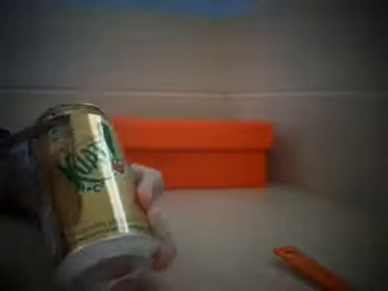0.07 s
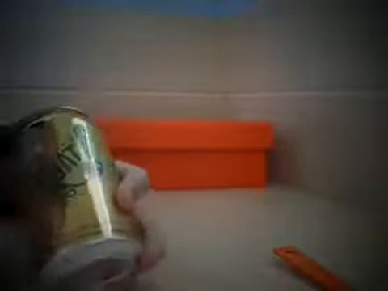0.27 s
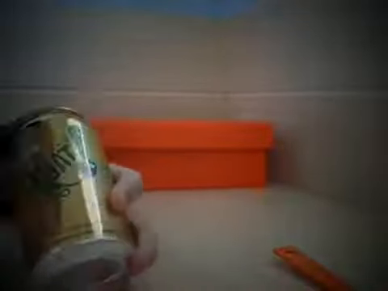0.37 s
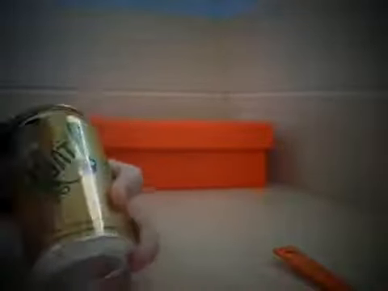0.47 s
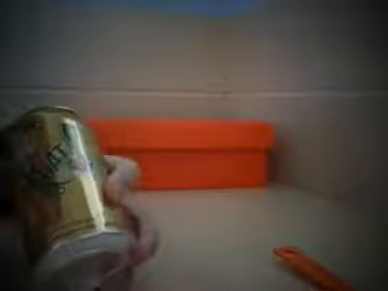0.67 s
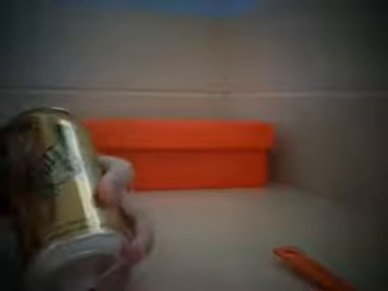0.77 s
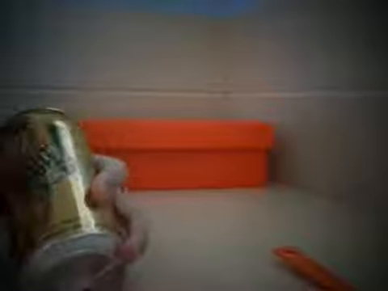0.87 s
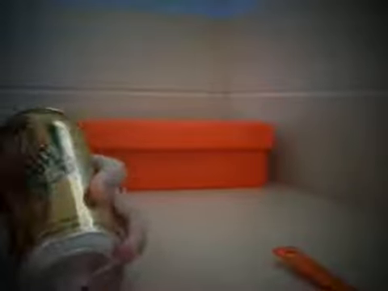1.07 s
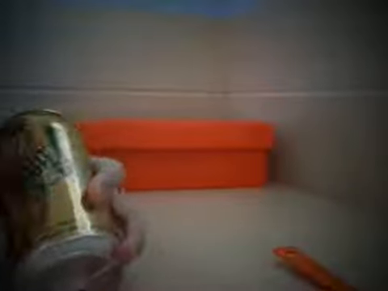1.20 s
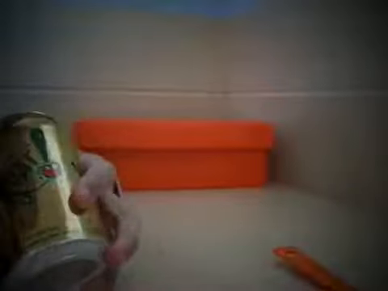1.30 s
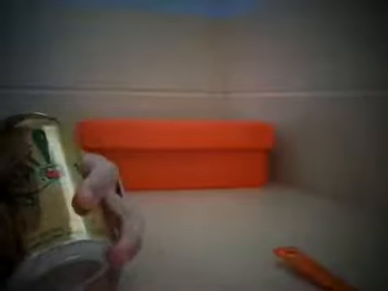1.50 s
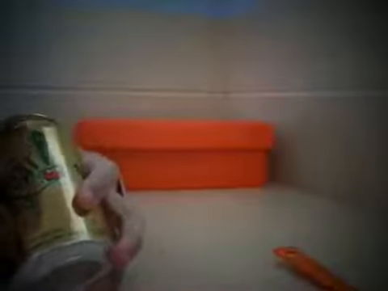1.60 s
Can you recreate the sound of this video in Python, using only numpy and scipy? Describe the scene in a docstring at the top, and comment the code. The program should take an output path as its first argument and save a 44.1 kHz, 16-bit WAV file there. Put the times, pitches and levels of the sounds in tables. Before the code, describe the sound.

A drinks can clacks sharply twice in quick succession and rings briefly. A softer double click follows, then hollow finger bumps and scratchy rubbing as the grip shifts, all heard close up in a small, slightly echoing room.

```python
"""Drinks can in a nook

A can is handled on a table in a hard-walled nook, close to the microphone. One loud double clack
sets the metal ringing, a lighter double click of the thin wall follows, and fingers bump and rub
the can. The nook adds quick echoes and a hollow boom; a small room rings on behind it, in stereo,
over quiet hiss."""
import sys
import numpy as np
from scipy import signal
from scipy.fft import rfft, irfft, next_fast_len
from scipy.io import wavfile
from scipy.ndimage import uniform_filter1d

SR = 44100
rng = np.random.default_rng(int(sys.argv[2]) if len(sys.argv) > 2 else 0)


def generate_wav(signal):
    """Clip the signal to [-1, 1] and save it as 16-bit WAV at the path in sys.argv[1]."""
    frames = np.transpose(np.atleast_2d(signal))
    scaled = np.clip(frames, -1, 1) * 32767
    pcm = np.round(scaled).astype(np.int16)
    wavfile.write(sys.argv[1], SR, pcm)


N = 72765

# steady hiss of the room: f/Hz, density/dB
HISS_SPECTRUM = [(25, 10.5), (60, -15), (120, -8), (180, -3.5), (300, -10.5), (500, -4), (1100, -8.5),
                 (2600, -10), (4600, -12.5), (14900, -14.5)]
# diffuse tail of the small room: f/Hz, level/dB, t60/s
ROOM_TAIL = [(62.4, 2.5, 0.8), (187, 6, 0.17), (492, -2, .55), (1220, -2.5, 0.69), (2620, -1, 0.62),
             (5960, -4.5, 0.57), (13750, 1, 0.47)]
# diffuse tail of the nook: f/Hz, level/dB, t60/s
NOOK_TAIL = [(60, -7, 0.069), (510, -6.5, 0.038), (2470, -1, 0.17), (7110, -1, 0.083), (13630, 5.5, 0.12)]
# left-right likeness of both tails: f/Hz, likeness/0-1
TAIL_LIKENESS = [(60, .8), (400, 0.99), (1500, 0.92), (3000, 0.87), (6000, 0.7), (14000, 0.7)]
# first echoes off the nook walls: delay/s, gain
WALL_ECHOES = [(.00165, 0.35), (.00335, 0.34), (.0051, .16)]
# rumble of the shifting grip: t/s, level/dB
RUMBLE_LEVELS = [(0, -81), (0.05, -57), (0.101, -77.5), (1.215, -70), (1.243, -40.5), (1.281, -43.5),
                 (1.31, -54.5), (1.371, -60), (1.48, -60.5), (1.55, -73), (1.65, -69)]
# resonances of that rumble: f/Hz, half-width/Hz, level/dB
RUMBLE_RESONANCES = [(80, 18, -6.5), (182, 22, -5.5), (283.4, 13, -1.5), (378, 8.3, -0.5)]
# fingers rubbing the can: t/s, body level/dB, scratch level/dB
RUB_LEVELS = [(0, -42, -52), (0.04, -56.5, -56.5), (0.071, -47.5, -55.5), (0.11, -65, -55),
              (0.199, -53.5, -56.5), (0.26, -45, -92), (0.64, -72, -61), (0.687, -43.5, -47.5),
              (0.72, -54, -74), (0.949, -78, -75), (1.109, -55, -67.5), (1.188, -63.5, -65.5),
              (1.222, -38, -38), (1.236, -29, -35), (1.262, -29.5, -38.5), (1.282, -21.5, -35.5),
              (1.296, -55, -52), (1.34, -83, -89), (1.384, -58, -64), (1.393, -49, -34), (1.412, -34, -33),
              (1.427, -36, -51.5), (1.468, -44.5, -48.5), (1.51, -64, -92), (1.555, -49.5, -65),
              (1.587, -39.5, -47), (1.612, -45, -38), (1.65, -55, -52)]
# resonances of the rubbed hollow body: f/Hz, full bandwidth/Hz, level/dB
BODY_RESONANCES = [(452.7, 7.3, 1), (494.1, 5.8, -5), (536, 5.3, -2), (618, 8.4, -3.5), (752, 25, -9),
                   (975, 10, -11), (1042, 16, -10), (1378, 53, -29.5)]
# scratch of skin on metal: f/Hz, density/dB
SCRATCH_SPECTRUM = [(30, -21.5), (150, -13), (300, -18.5), (550, -17), (1000, 4), (1600, 1.5), (2400, 2),
                    (3800, 1.5), (4700, -3.5), (6200, -4), (9000, -9), (14500, -18.5)]
# brief slips within the rubbing: t/s, level/dB
FINGER_SLIPS = [(0.05, -41.5), (0.6188, -31), (1.2078, -47), (1.2150, -38.5), (1.2272, -34), (1.2375, -29),
                (1.2493, -41.5), (1.2579, -31), (1.2704, -28), (1.277, -29.5), (1.2850, -35.5),
                (1.4085, -31), (1.599, -44)]
# soft bumps of fingers and can: t/s, level/dB
FINGER_BUMPS = [(0.3750, -37), (0.3880, -52), (0.6965, -39.5), (1.0140, -33.5), (1.0720, -49),
                (1.0920, -48.5), (1.2390, -23), (1.2580, -25.5), (1.2690, -57), (1.2780, -25.5),
                (1.4110, -37.5), (1.4600, -33), (1.5670, -50), (1.6060, -38), (1.6280, -36.5)]
# hollow boom of any bump: f/Hz, level/dB, t60/s
BOOM_MODES = [(453, 0, .105), (505, -5, .045), (630, -19, .08), (813, -18, .09), (1070, -22, .04),
              (1440, -24, .04)]
# light clicks of the thin wall: t/s, level/dB, boom/dB re the click
WALL_CLICKS = [(0.0497, -37, -19), (0.066, -48, -30), (0.1290, -47, -30), (0.1450, -50, -28),
               (0.6196, -26.5, -16.5), (0.6313, -24, -9.5), (0.694, -54.5, 11), (1.0137, -43.5, -20.5),
               (1.4080, -29, -10.5)]
# metal ringing after a click: f/Hz, level/dB, t60/s
WALL_MODES = [(821, -11.5, .022), (2247, 3.5, 0.036), (2970, -18, 0.054), (4080, -10, 0.029),
              (5460, -12.5, .01)]
# snap of a click: f/Hz, density/dB
SNAP_SPECTRUM = [(60, -49.5), (150, -22.5), (300, -27), (520, -2), (850, 5.5), (1200, -8), (1500, -6),
                 (2300, 1), (4000, -2), (7500, -21), (11000, -16.5), (14500, -42)]
# hard knocks that make up the double clack: t/s, level/dB, boom/dB re the knock
HARD_KNOCKS = [(0.2115, -37.5, -19.5), (0.2150, -26.5, -7.5), (0.2179, -21.5, -25.5),
               (0.2191, -11.5, -17.5), (0.2222, -25.5, -20.5), (0.2319, -16.5, -13), (0.241, -18.5, -8),
               (0.2455, -23.5, -23.5)]
# metal ringing after a hard knock: f/Hz, level/dB, t60/s
KNOCK_MODES = [(689, -17, .12), (1000, -22, .08), (1825, -18, .08), (2073, -17, .24), (2300, -19, .22),
               (2379, -6, .065), (2606, -18, .16), (2850, -13, .09), (2928, -7, .05), (3000, -4, .055),
               (3157, -14, .06), (3542, -10, .065), (4152, -13, .05), (5308, -17, .05), (5800, -6, .02),
               (7472, -15, .05)]
# crack of a hard knock: f/Hz, density/dB
CRACK_SPECTRUM = [(30, -26), (100, -25.5), (180, -9.5), (320, -15), (480, -6.5), (1050, -4), (1300, -6.5),
                  (1850, -4), (2700, 1), (4500, -6), (5800, -7.5), (8500, -14.5), (14500, -26)]

HISS_DB, HISS_LIKENESS = -59.5, 0.84
WHINE_DB, WHINE_HZ, WHINE_HALF_WIDTH_HZ = -71, 12290, 60
GRAINS_PER_S, GRAIN_SPREAD_DB, SLIP_S = 1100, 5.5, .0011
BODY_LOW_HZ, BODY_HIGH_HZ, METAL_LOW_HZ = 355, 1800, 453
SNAP_SEND, RING_SEND, HOLLOW_SEND = .68, .15, .4  # gains into the diffuse tails


def amp(db):
    """Decibels to gain."""
    return 10 ** (np.asarray(db) / 20)


def unit_rms(x):
    """Scales to rms 1."""
    return x / np.sqrt(np.mean(x ** 2) + 1e-20)


def unit_hit(x):
    """Scales a short sound to the energy of 10 ms at rms 1."""
    return x / np.linalg.norm(x) * np.sqrt(SR / 100)


def lookup(table, hz, column=1):
    """Interpolates one column of a table on a log-frequency axis."""
    columns = np.transpose(table)
    return np.interp(np.log(hz + 1), np.log(columns[0] + 1), columns[column])


def filtered(x, gain):
    """Filters by a gain that is a function of frequency."""
    size = 2 * next_fast_len(N)
    return irfft(rfft(x, size) * gain(np.fft.rfftfreq(size, 1 / SR)), size)[..., :N]


def stereo(x, likeness):
    """Mixes two unrelated signals into left and right, with a given likeness per frequency."""
    mid = filtered(x[0], lambda hz: np.sqrt((1 + likeness(hz)) / 2))
    side = filtered(x[1], lambda hz: np.sqrt((1 - likeness(hz)) / 2))
    return np.array([mid + side, mid - side])


def play(events, sound):
    """Starts a sound at the time and level that open each row."""
    track = np.zeros(N + len(sound))
    for start_s, db, *_ in events:
        at = round(start_s * SR)
        track[at:at + len(sound)] += amp(db) * sound
    return track[:N]


def background():
    """Room tone: quiet hiss with a faint high whine."""
    noise = stereo(rng.standard_normal((2, N)), lambda hz: HISS_LIKENESS)
    hiss = filtered(noise, lambda hz: amp(lookup(HISS_SPECTRUM, hz)))
    whine = filtered(rng.standard_normal(N),
                     lambda hz: 1 / (1 + ((hz - WHINE_HZ) / WHINE_HALF_WIDTH_HZ) ** 2))
    return amp(HISS_DB) * unit_rms(hiss) + amp(WHINE_DB) * unit_rms(whine)


def diffuse_tail(x, bands, rise_s):
    """Dense reflections build up at the microphone, then each band dies at its own speed."""
    hz, t, noise = signal.stft(rng.choice([-1., 1.], (2, N)), SR, nperseg=256)
    rate = np.log(1000) / lookup(bands, hz, column=2)[:, None]
    decay = np.sqrt(2 * rate / SR) * np.exp(-rate * t)  # same energy at any t60
    spectra = noise * amp(lookup(bands, hz))[:, None] * decay
    response = signal.istft(spectra, SR, nperseg=256)[1][:, :N]
    response = stereo(response, lambda f: lookup(TAIL_LIKENESS, f))
    response *= 1 - np.exp(-(np.arange(N) / SR / rise_s) ** 2)
    return signal.fftconvolve(x[None], response, axes=1)[:, :N]


def nook_echoes(x):
    """The direct sound plus its first echoes off the nearby hard walls."""
    return x + sum(gain * np.pad(x, (round(delay_s * SR), 0))[:N] for delay_s, gain in WALL_ECHOES)


def even_grip(x, window_s=.0227):
    """Holds a noisy sound near rms 1, as an even grip does."""
    size = round(window_s * SR)
    power = uniform_filter1d(uniform_filter1d(x ** 2, size), size)
    return x / np.sqrt(abs(power) + 1e-20)


def grip_rumble():
    """The hand shifts its grip and stirs low resonances under the rubbing."""
    def resonances(hz):
        return sum(amp(db) / (1 + ((hz - f) / width) ** 2) for f, width, db in RUMBLE_RESONANCES)

    level_db = np.interp(np.arange(N) / SR, *np.transpose(RUMBLE_LEVELS))
    return even_grip(filtered(rng.standard_normal(N), resonances)) * amp(level_db)


def hollow_body(hz):
    """Response of the rubbed can: narrow resonances, with bass and treble rolled off."""
    peaks = sum(amp(db) / (1 + 2j * (hz - f) / width) for f, width, db in BODY_RESONANCES)
    return peaks / (1 + (hz / BODY_HIGH_HZ) ** 4) / (1 + (BODY_LOW_HZ / (hz + 1)) ** 4)


def skin_scratch(friction):
    """Gives friction the colour of skin on metal, at rms 1."""
    return unit_rms(filtered(friction, lambda hz: amp(lookup(SCRATCH_SPECTRUM, hz))))


def rubbing():
    """Tiny stick-slip grains drive the hollow body and scratch the wall; a few slips stand out."""
    t = np.arange(N) / SR
    times, body_db, scratch_db = np.transpose(RUB_LEVELS)
    grains = rng.standard_normal((2, N)) * (rng.random((2, N)) < GRAINS_PER_S / SR)
    grains *= amp(GRAIN_SPREAD_DB * np.minimum(rng.exponential(1, (2, N)), 3))
    body = even_grip(filtered(grains[0], hollow_body)) * amp(np.interp(t, times, body_db))
    scratch = skin_scratch(grains[1]) * amp(np.interp(t, times, scratch_db))
    slip_envelope = sum(amp(db) * np.exp(-.5 * ((t - at) / SLIP_S) ** 2) for at, db in FINGER_SLIPS)
    slips = skin_scratch(rng.standard_normal(N)) * slip_envelope
    return body, scratch + slips


def ring(modes, low_hz, bend=0, settle_s=1):
    """Dying sines of a small struck object, which radiates no bass; bend starts them sharp."""
    t = np.arange(SR // 2) / SR
    bent_t = t + bend * settle_s * (1 - np.exp(-t / settle_s))
    sines = sum(amp(db - 60 * t / t60) * np.sin(2 * np.pi * hz * bent_t) for hz, db, t60 in modes)
    low_cut = signal.butter(3, low_hz, "high", fs=SR, output="sos")
    return unit_hit(signal.sosfilt(low_cut, sines))


def hollow_booms():
    """Every bump, knock and click stirs the same hollow boom, which sags in pitch as it dies."""
    thuds = [(at, db + boom_db) for at, db, boom_db in HARD_KNOCKS + WALL_CLICKS]
    return play(FINGER_BUMPS + thuds, ring(BOOM_MODES, low_hz=347, bend=.16, settle_s=.0077))


def metal_ringing():
    """The metal rings after each hard knock, and very briefly after each click."""
    knocked = play(HARD_KNOCKS, ring(KNOCK_MODES, METAL_LOW_HZ))
    clicked = play(WALL_CLICKS, ring(WALL_MODES, METAL_LOW_HZ))
    return amp(-3) * knocked + amp(-6) * clicked


def tick(spectrum, size=4096):
    """A sharp-fronted, minimum-phase click of a given colour."""
    hz = abs(np.fft.fftfreq(size, 1 / SR))
    log_gain = np.log(amp(lookup(spectrum, hz)))
    minimum_phase = np.exp(np.conj(signal.hilbert(log_gain)))
    return unit_hit(np.fft.ifft(minimum_phase).real[:size // 2])


def contact(spectrum, fade_s, rattle):
    """A click followed by a few milliseconds of even-toned chatter in the contact."""
    t = np.arange(SR // 20) / SR
    fade = amp(-60 * t / fade_s)
    chatter = rng.standard_normal(len(t)) * fade
    chatter *= rattle / np.linalg.norm(chatter)
    chatter[0] += 1  # the first impact
    for _ in range(10):  # flatten the spectrum while keeping the burst short
        bins = rfft(chatter)
        chatter = irfft(bins / (abs(bins) + 1e-12), len(t)) * np.minimum(10 * fade, 1)
    return unit_hit(signal.fftconvolve(chatter, tick(spectrum)))


def wall_snaps():
    """The thin wall snaps lightly at each click, with little chatter."""
    snaps = sum(play([click], contact(SNAP_SPECTRUM, fade_s=.004, rattle=.9)) for click in WALL_CLICKS)
    return amp(-6) * snaps


def knock_cracks():
    """Each hard knock of the can cracks and chatters; in quick succession they make the double clack."""
    cracks = sum(play([hit], contact(CRACK_SPECTRUM, fade_s=.02, rattle=2.47)) for hit in HARD_KNOCKS)
    return amp(-6) * cracks


def scene():
    """The can close up and centred, the nook around it and the room behind."""
    cracks, snaps = knock_cracks(), wall_snaps()
    ringing, booms = metal_ringing(), hollow_booms()
    body, scratch = rubbing()
    close = nook_echoes(cracks + snaps + ringing) + booms + body + scratch
    send = cracks + scratch + SNAP_SEND * snaps + RING_SEND * ringing + HOLLOW_SEND * (booms + body)
    nook = diffuse_tail(send, NOOK_TAIL, rise_s=.0005)
    room = diffuse_tail(send, ROOM_TAIL, rise_s=.0064)
    return close + nook + room + grip_rumble() + background()


def record(dry):
    """The microphone signal overloads at full scale, then is band-limited to 15 kHz."""
    low_pass = signal.firwin(401, 15000, window=("kaiser", 8), fs=SR)
    return signal.oaconvolve(np.clip(dry, -1, 1), low_pass[None], "same")


dry = scene()
out = record(dry)
generate_wav(out)
```